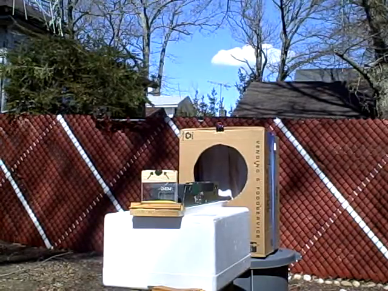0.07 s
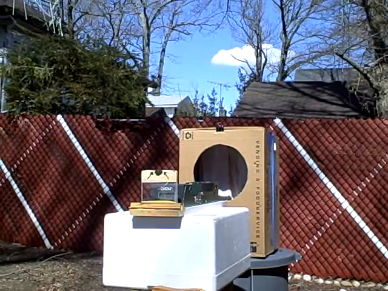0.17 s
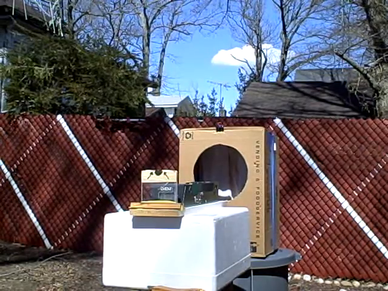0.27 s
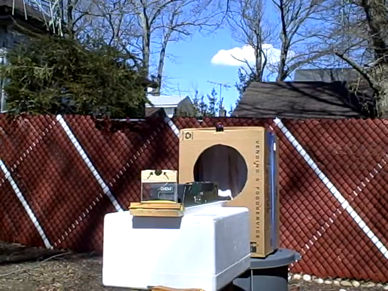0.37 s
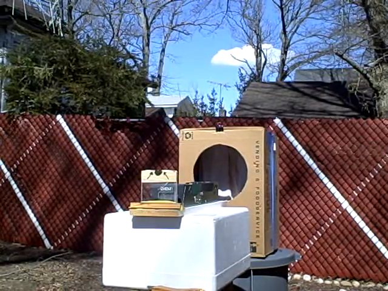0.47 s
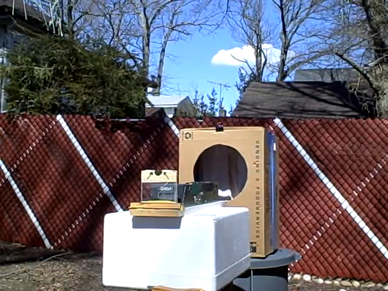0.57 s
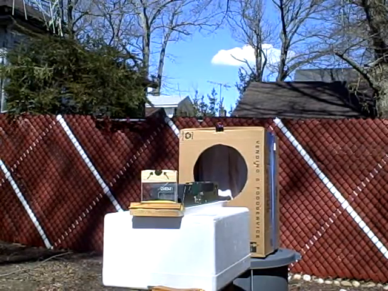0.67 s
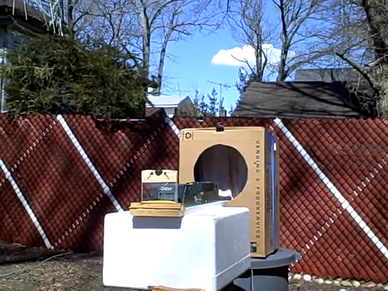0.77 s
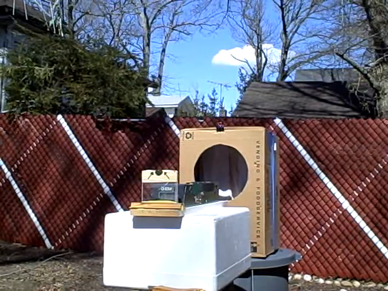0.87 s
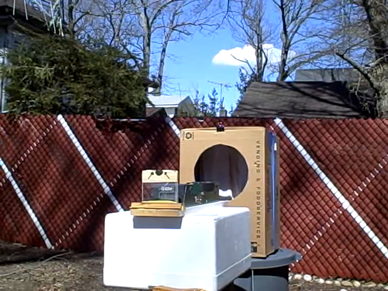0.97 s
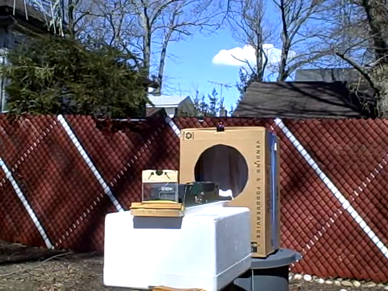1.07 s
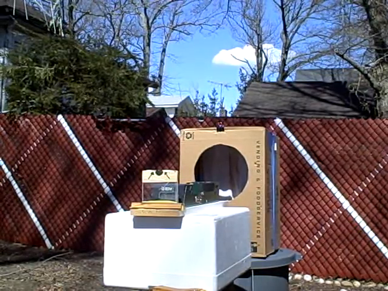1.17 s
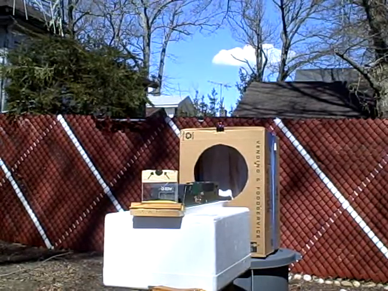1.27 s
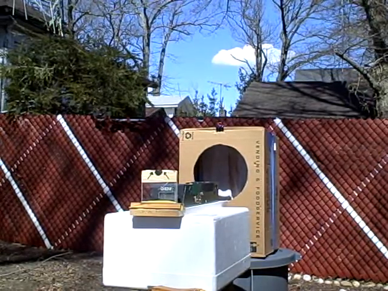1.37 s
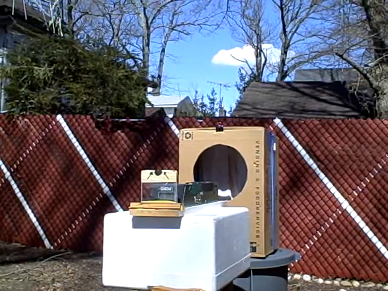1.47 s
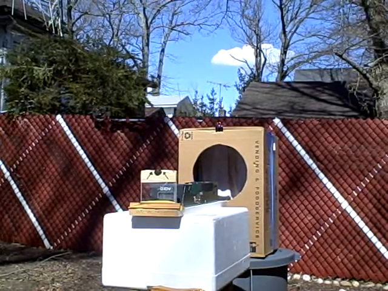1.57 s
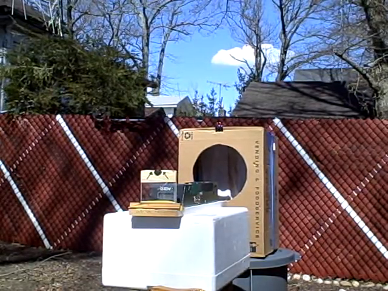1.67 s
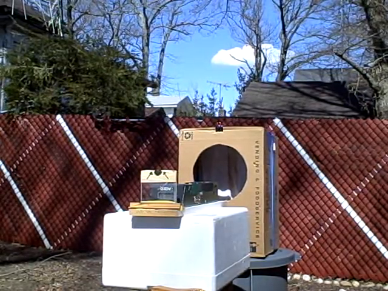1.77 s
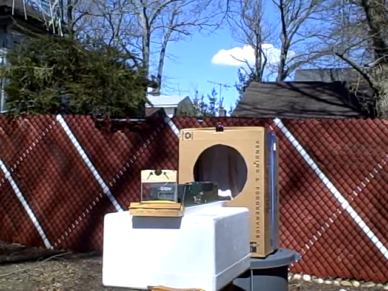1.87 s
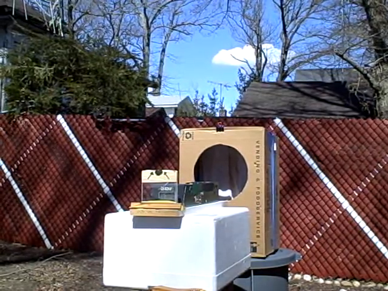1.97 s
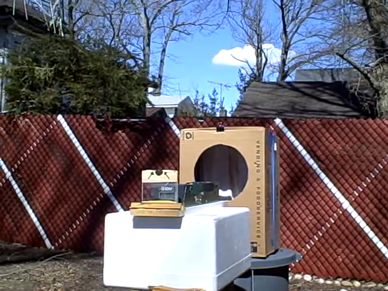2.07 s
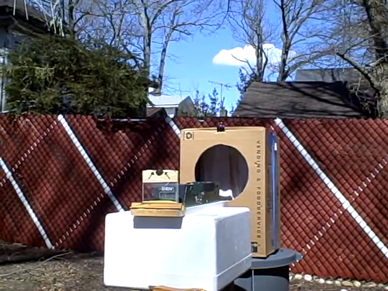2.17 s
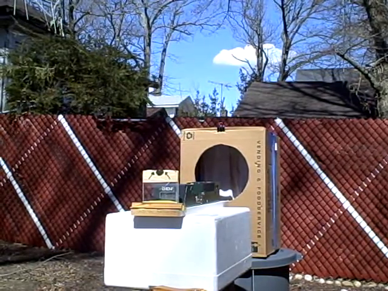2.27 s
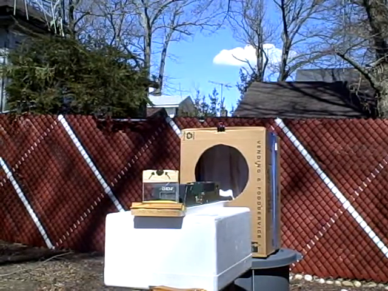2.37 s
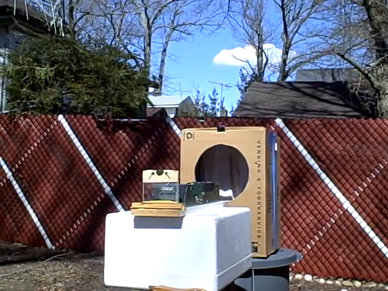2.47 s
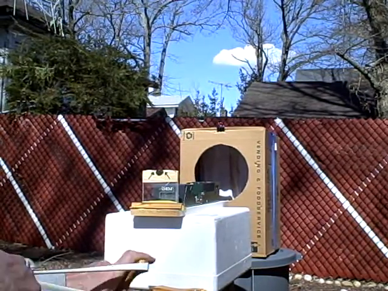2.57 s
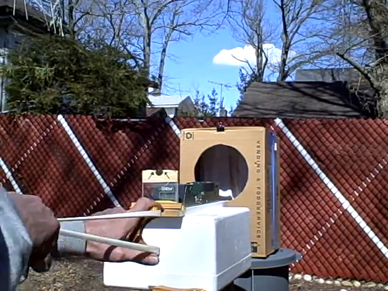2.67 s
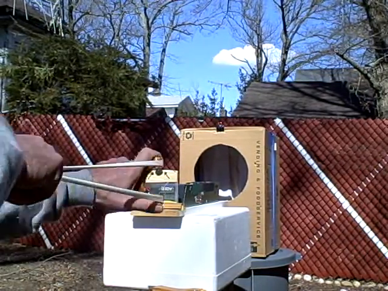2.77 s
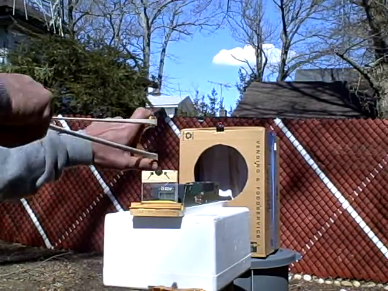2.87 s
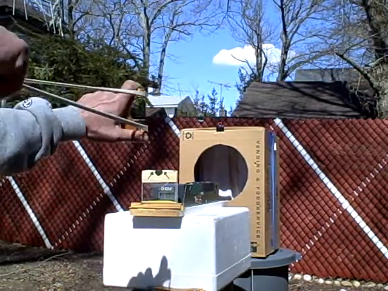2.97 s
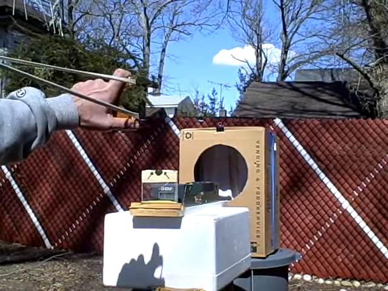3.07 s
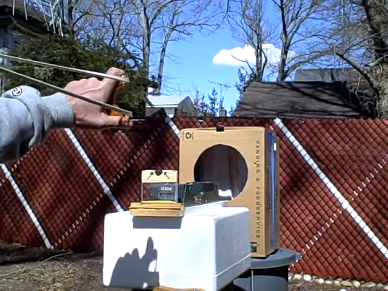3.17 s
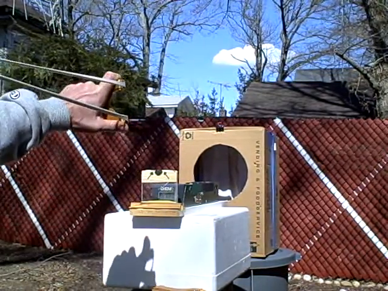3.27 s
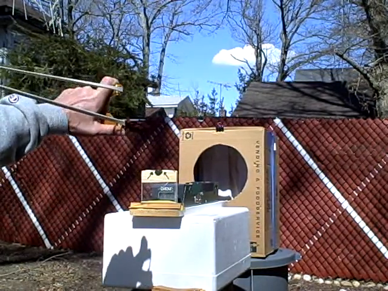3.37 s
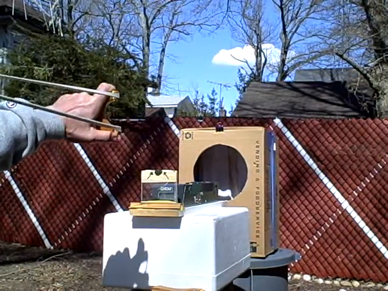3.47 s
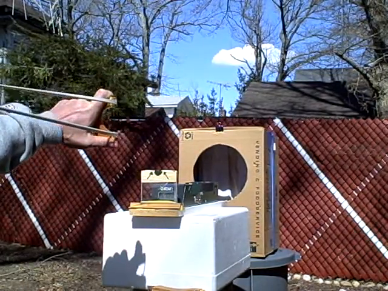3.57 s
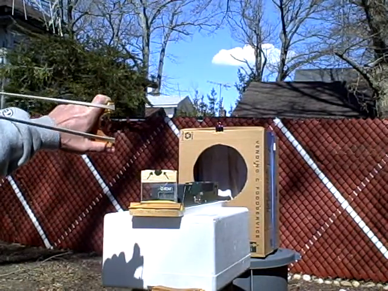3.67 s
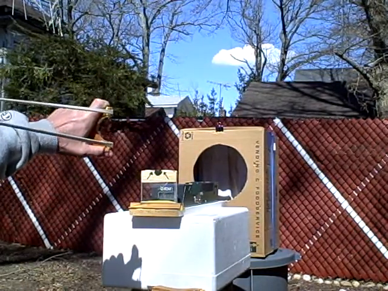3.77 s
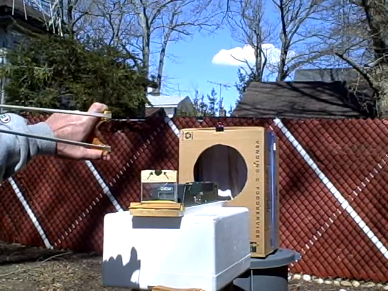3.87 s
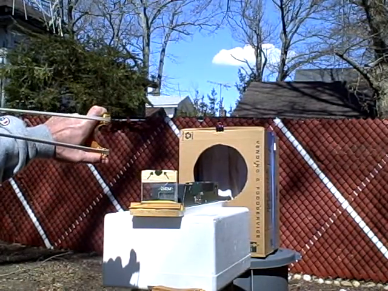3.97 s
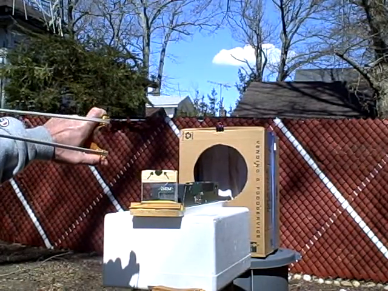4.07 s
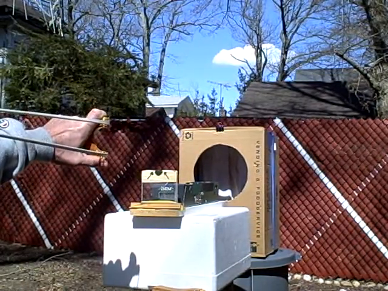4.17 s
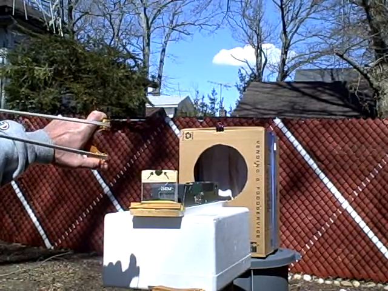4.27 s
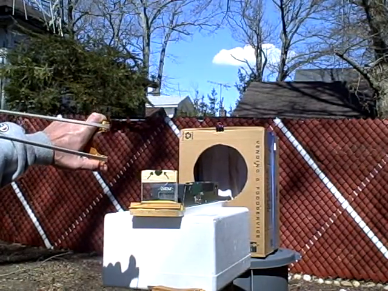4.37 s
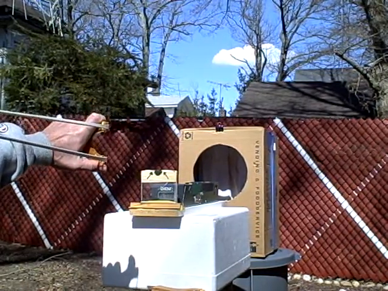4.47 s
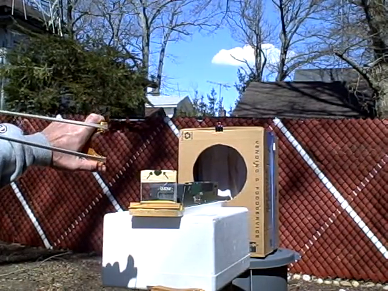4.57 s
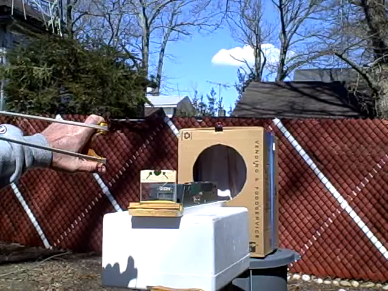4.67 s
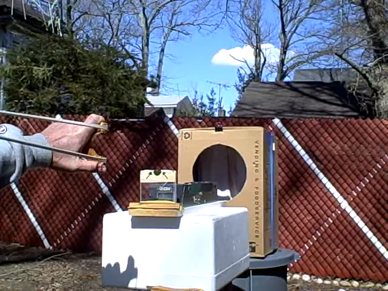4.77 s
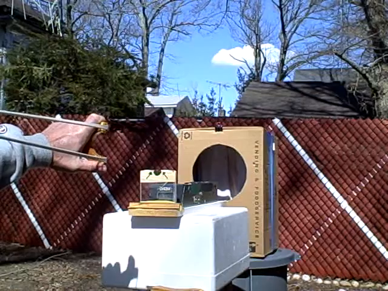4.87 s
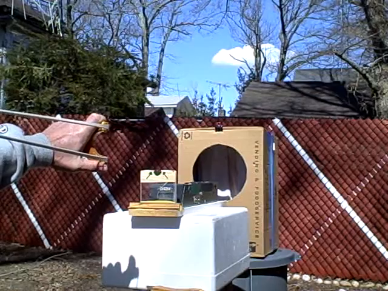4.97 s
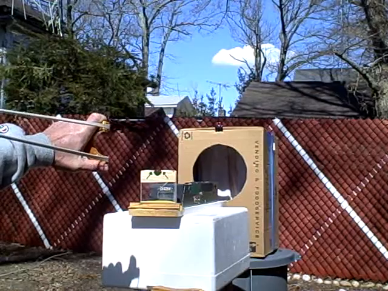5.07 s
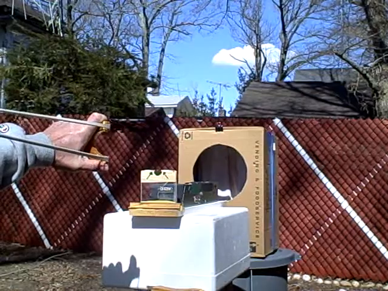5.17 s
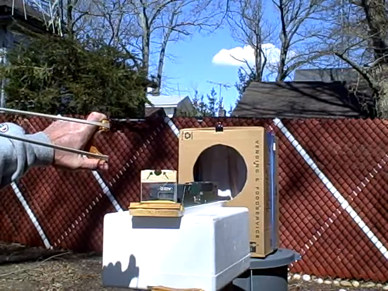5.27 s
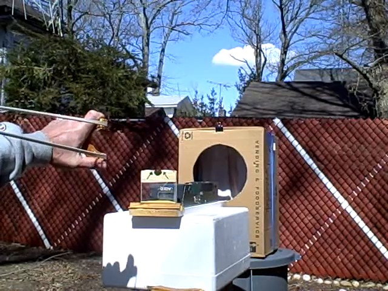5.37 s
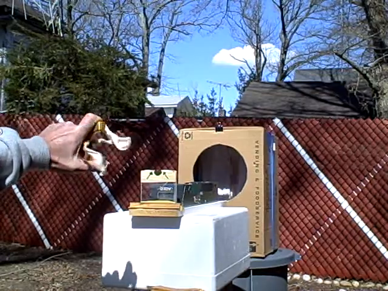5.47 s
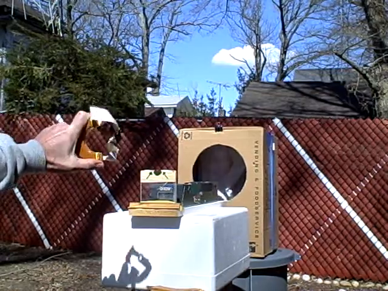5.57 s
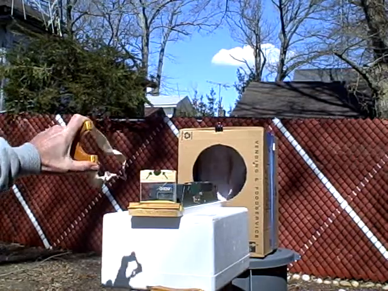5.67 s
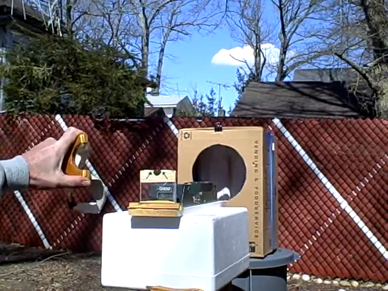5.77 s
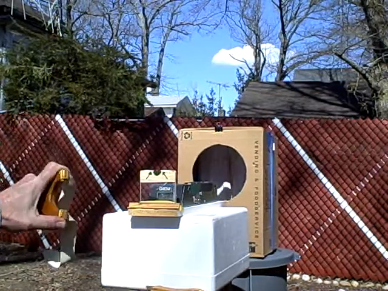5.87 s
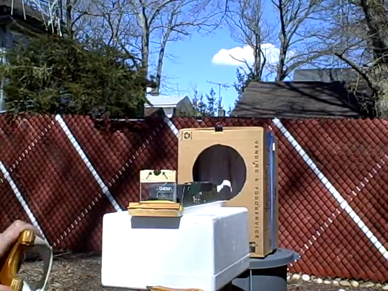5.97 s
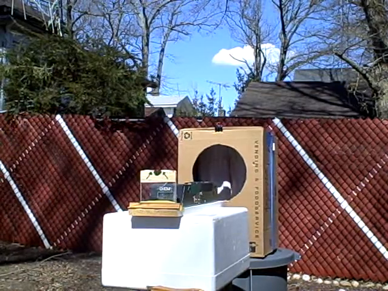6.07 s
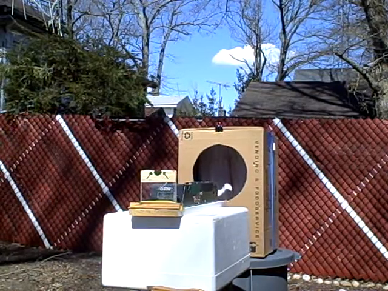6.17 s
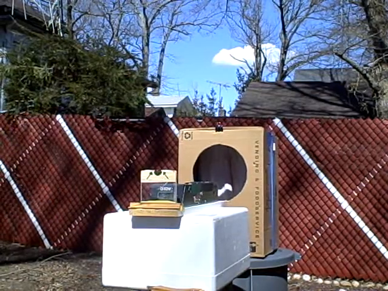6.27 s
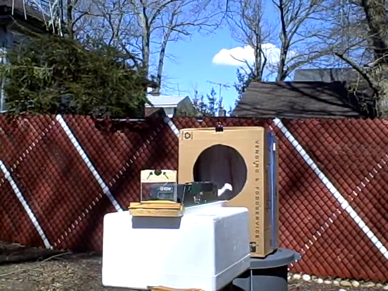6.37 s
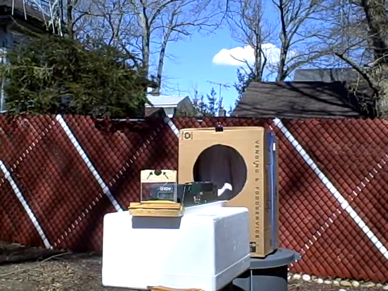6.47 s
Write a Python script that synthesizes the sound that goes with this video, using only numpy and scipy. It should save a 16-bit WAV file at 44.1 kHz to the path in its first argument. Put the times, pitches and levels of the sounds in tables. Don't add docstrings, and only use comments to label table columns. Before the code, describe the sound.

In a breezy backyard, sleeves rustle, then slingshot bands snap with a harsh overloaded crack as a ball thuds into a cardboard box and bounces.

```python
import sys
import numpy as np
from scipy import signal
from scipy.fft import rfft, irfft
from scipy.io import wavfile
from scipy.ndimage import uniform_filter1d

SR = 44100
rng = np.random.default_rng(int(sys.argv[2]) if len(sys.argv) > 2 else 0)


def invert_db(level):
    return 10 ** (np.asarray(level, dtype=float) / 20)


def wav_record(signal):
    frames = np.transpose(np.atleast_2d(signal))
    bounded = np.clip(frames, -1, 1)
    quanta = np.round(bounded * 32767).astype(np.int16)
    wavfile.write(sys.argv[1], SR, quanta)


N = 287443
T = np.arange(N) / SR
RELEASE_S = 5.47


def level(x, db):
    return x * invert_db(db) / np.sqrt(np.mean(x ** 2))


def colour(x, points):
    hz, db = np.transpose(points)
    grid_hz = np.linspace(1, SR / 2, 2049)
    shape_db = np.interp(np.log(grid_hz), np.log(hz), db)
    cepstrum = irfft(np.log(invert_db(shape_db)))
    cepstrum[1:2048] *= 2
    cepstrum[2049:] = 0
    response = irfft(np.exp(rfft(cepstrum)))[:2048]
    return signal.fftconvolve(x, response / np.sqrt(np.sum(response ** 2)))[:N]


def band(lo_hz, hi_hz):
    sos = signal.butter(3, [lo_hz, hi_hz], "band", fs=SR, output="sos")
    return level(signal.sosfilt(sos, rng.standard_normal(N)), 0)


def walk(rate):
    hold = int(SR / rate)
    steps = np.repeat(rng.standard_normal(N // hold + 1), hold)
    smooth = uniform_filter1d(uniform_filter1d(steps, hold), hold)
    return 1.3 * smooth[:N]


def swells(times, dbs, rises, fades):
    rises, fades = np.maximum(rises, 1e-3), np.maximum(fades, 1e-3)
    s, db, rise, fade = (v[:, None] for v in np.broadcast_arrays(times, dbs, rises, fades))
    t = T[::50]
    drop_db = 20 * np.maximum((s - t) / rise, (t - s) / fade)
    return np.interp(T, t, invert_db(np.max(db - drop_db, axis=0)))


def bursts(rows, rise=0.00061):
    out, age = np.zeros(N + SR), T[:SR // 4]
    for s, db, t60 in rows:
        start = int(s * SR)
        decay = np.exp(-np.log(1000) * age / t60)
        out[start:start + len(age)] += invert_db(db) * (1 - np.exp(-age / rise)) * decay
    return out[:N]


def cracks(rows, points):
    ringing = colour(rng.standard_normal(N), points)
    ringing /= uniform_filter1d(np.abs(ringing), size=36) + .12
    fronts = np.zeros(N)
    for s, db, _ in rows:
        fronts[int(s * SR)] += 0.68 * invert_db(db)
    return .46 * ringing * bursts(rows, rise=.0003) + colour(fronts, points)


# frequency in Hz, strength in dB per Hz.
TRAFFIC_COLOUR = [(65, -25.5), (110, -7), (161, -1.5), (231, -3.5), (252, -16.5), (354, -4.5), (422, -10.5),
                  (456, -3), (549, -11), (605, -5.5), (646, -16), (840, -12.5), (969, -16.5), (1060, -24),
                  (1500, -34.5), (1950, -57), (3300, -120)]
# frequency in Hz, strength in dB per Hz.
HISS_COLOUR = [(820, -30), (1400, -5.5), (2650, -7.5), (3100, -4.5), (3700, -9), (5000, -7.5), (6240, -2),
               (7100, -6), (7700, -12.5), (8050, -18.5), (8660, -26.5), (9000, -39), (11700, -60),
               (19800, -120)]
TRAFFIC_DB, HISS_DB = -52, -66


def suburb():
    traffic = level(colour(rng.standard_normal(N), TRAFFIC_COLOUR), TRAFFIC_DB) * invert_db(0.69 * walk(2.3))
    return traffic + level(colour(rng.standard_normal(N), HISS_COLOUR), HISS_DB)


# frequency in Hz, level in dB, loss in dB from one side line to the next.
WHINE_LINES = [(7598, -75.5, 7), (7656.2, -77, 11), (8343.8, -88, 10), (8402, -88, 9)]
# frequency in Hz, level in dB.
LONE_TONES = [(2860, -91), (4740, -92), (4796, -91), (6105, -88)]
READ_OUT_HZ = 58.2


def camera():
    lines = [(hz, invert_db(db)) for hz, db in LONE_TONES]
    for k, (hz, db, fade_db) in enumerate(WHINE_LINES):
        direction = -(-1) ** k
        for side in range(4):
            flip = (-1) ** side
            lines.append((hz + direction * side * READ_OUT_HZ, flip * invert_db(db - fade_db * side)))
    return sum(np.sqrt(2) * size * np.sin(2 * np.pi * hz * T) for hz, size in lines)


# start in seconds, peak in dB, pitch in Hz, length in seconds.
YAP_EVENTS = [
    (0.95, -70, 1320, 0.19),
    (0.956, -65, 1044, .1),
    (1.2, -61.5, 978, 0.15),
    (3.627, -71.5, 1310, 0.16),
    (3.608, -67, 1108, 0.084),
    (3.877, -61, 944, 0.17),
    (4.725, -57.5, 980, 0.15),
    (5.701, -52, 1480, 0.0058),
]


def dog():
    waver = 2 * np.pi * np.cumsum(.012 * walk(90)) / SR
    out = np.zeros(N)
    for s, db, hz, length in YAP_EVENTS:
        age = np.maximum(T - s, 0) / (length / 3)
        swell = np.e * age * np.exp(-age)
        out += invert_db(db) * swell * np.sin(hz * (2 * np.pi * T + waver))
    return out


# loudest moment in seconds, flutter level in dB,
# fade in seconds per 20 dB (below zero: sudden), rumble level in dB.
GUST_EVENTS = [(.22, -39, 0.35, -47), (.35, -32, 0.3, -41), (.54, -33.5, 0.36, -46), (.8, -32, 0.24, -52),
               (.95, -33.5, 0.2, -54), (1.07, -31.5, 0.18, -50), (1.2, -38.5, 0.26, -50.5),
               (1.42, -37.5, 0.34, -58), (1.7, -37, -0.7, -56), (1.84, -34.5, 0.37, -51.5),
               (2.12, -30, 0.43, -49), (2.382, -26, 0.16, -40.5), (2.539, -25.5, 0.2, -40.5),
               (2.749, -28, 0.2, -40), (2.919, -21, 0.05, -33.5), (3.14, -41, 0.6, -60),
               (3.42, -39, 0.3, -57), (3.85, -41, 0.23, -54), (4.08, -42, 0.5, -59),
               (4.36, -34.5, 0.05, -50), (4.72, -52.5, 0.5, -53.5), (4.91, -45.5, -0.2, -54),
               (5.4, -43.5, 0.7, -54), (5.53, -30.5, 0.11, -27.5), (5.72, -44.5, 0.33, -51),
               (5.96, -44, 0.3, -62.5), (6.09, -42.5, .12, -53), (6.36, -45, .2, -55)]
GUST_RISE_SHARE = .8
BREEZE_DB, BREEZE_RUMBLE_DB = -55.5, -59


def wind():
    s, flutter_db, fade, rumble_db = np.transpose(GUST_EVENTS)
    rise = GUST_RISE_SHARE * fade
    flutter = (invert_db(BREEZE_DB) + swells(s, flutter_db, rise, fade)) * band(10.0, 58.7)
    rumble = (invert_db(BREEZE_RUMBLE_DB) + swells(s, rumble_db, rise, fade)) * band(55, 155.0)
    return flutter + rumble * invert_db(1.2 * walk(25))


# loudest moment in seconds, fine weave level in dB, rise in seconds per 20 dB,
# fade in seconds per 20 dB (zero or less: sudden), broad folds level in dB.
ARM_MOVES = [(.33, -74, .3, 1.5, -72), (.56, -61.5, .2, -0.5, -69), (.8, -62.5, 0.76, 0.5, -65.5),
             (.945, -56, 0.16, .04, -72), (1.1, -61, 0.034, .07, -73), (1.22, -54.5, 0.045, 0.05, -71),
             (1.262, -52.5, 0.087, 0.03, -72), (1.5, -65.5, .04, 0, -85), (1.58, -71, .1, .1, -69),
             (1.82, -71, .2, -0.5, -72), (2.02, -62, 0.15, 0.07, -65.5), (2.25, -72, .2, 0.7, -76),
             (2.56, -59, .25, 0.6, -70), (2.72, -55.5, 0.49, 0.63, -69), (3.1, -63.5, 0.56, 0.3, -69.5),
             (3.25, -64.5, .1, 0, -71.5), (5.62, -68, .03, .5, -67), (5.78, -66.5, .3, 2, -77.5),
             (5.96, -61, .3, .3, -66.5), (6.1, -64.5, .2, 2, -76)]
# start in seconds, peak in dB, time to fade by 60 dB in seconds.
CREASES = [(0.6864, -61, 0.025), (0.9174, -52, 0.025), (1.2141, -47, 0.023), (1.2364, -45, 0.027),
           (2.5494, -42, 0.016), (2.658, -57, 0.025), (2.7412, -47, 0.025), (3.114, -45, 0.025),
           (5.6389, -35, 0.015), (5.6772, -24, 0.013), (5.7244, -43.5, 0.028), (5.7793, -49, 0.05),
           (6.037, -45, 0.025), (6.0943, -42, 0.027)]
# frequency in Hz, strength in dB per Hz.
WEAVE_COLOUR = [(900, -46.5), (1600, -19), (3200, -17.5), (4500, -13.5), (5230, -10.5), (5980, 2),
                (6660, -0.5), (7900, -12.5), (8670, -28), (9000, -33), (11700, -61.5), (19800, -120)]


def rustle():
    grain = invert_db(walk(300) + walk(40))
    s, fine_db, rise, fade, folds_db = np.transpose(ARM_MOVES)
    fine = swells(s, fine_db, rise, fade) + 0.47 * bursts(CREASES)
    weave = colour(level(grain * rng.standard_normal(N), 0) * fine, WEAVE_COLOUR)
    folds = swells(s, folds_db, rise, fade) * level(grain * band(4300, 5300), 0)
    return weave + folds


# loudest moment in seconds, level in dB.
SCUFF_EVENTS = [
    (5.6, -72),
    (5.95, -66.5),
    (6.3, -74),
]
SCUFF_RISE_S, SCUFF_FADE_S = .3, 0.91


def settling():
    s, db = np.transpose(SCUFF_EVENTS)
    scuffs = swells(s, db, SCUFF_RISE_S, SCUFF_FADE_S) * (T > RELEASE_S)
    return scuffs * invert_db(2 * walk(150)) * band(900, 3800)


# start in seconds, peak in dB, time to fade by 60 dB in seconds.
LANDINGS = [
    (5.8800, -18, 0.013),
    (5.8815, -16.5, 0.015),
    (5.8850, -28, 0.14),
    (5.9100, -41, 0.016),
    (6.2955, -37.5, 0.042),
]
# frequency in Hz, strength in dB per Hz.
LANDING_COLOUR = [(530, -29), (900, -1), (1310, -11.5), (3000, -4), (3530, -13), (4080, -5), (4630, -8.5),
                  (6490, 5), (9000, -40), (11700, -66), (19800, -120)]


def bounces():
    return cracks(LANDINGS, LANDING_COLOUR)


# start in seconds, level in dB, contact time in seconds, chatter time in seconds,
# pitch of the struck panel in Hz.
BALL_BLOWS = [
    (5.4750, -29, 0.00035, 0.0023, 850),
    (5.5035, -4.5, .0003, .0006, 340),
    (5.5075, -7.5, 0.00023, .008, 860),
    (5.5200, -16, .0007, .004, 310),
    (5.8825, -21, .0003, .005, 640),
    (5.8930, -26.5, .0002, 0.0089, 830),
    (5.9090, -26, .0004, 0.016, 620),
    (6.2963, -24.5, 0.00094, 0.0014, 389),
]
# frequency in Hz, level in dB, time to fade by 60 dB in seconds.
BOX_MODES = [(79.5, -17, 0.071), (150, -17.5, .12), (247, -5, 0.078), (304, 0, .09), (384, -4.5, 0.053),
             (484, -7, 0.093), (568, -12, .06), (696, -5, 0.069), (851, 0, 0.043), (1050, -7.5, 0.038),
             (1320, -8.5, 0.03), (1670, -8.5, .03), (2150, -6.5, 0.056), (2900, 0, 0.044)]
RING_SHARE = 0.84


def box():
    out, t = np.zeros(N + SR), T[:SR // 4]
    hz, db, t60 = np.array(BOX_MODES).T[:, :, None]
    spots = rng.standard_normal((len(BALL_BLOWS), len(BOX_MODES), 1))
    grits = rng.standard_normal((len(BALL_BLOWS), len(t)))
    decay = np.exp(-np.log(1000) * t / (t60 * RING_SHARE))
    for (s, blow_db, contact, chatter, panel_hz), spot, grit in zip(BALL_BLOWS, spots, grits):
        ring = invert_db(db + 1.5 * spot) * np.sin(2 * np.pi * hz * (1 + 0.018 * spot) * t) * decay
        soft = 1 / (1 + (2 * hz * contact) ** 2)
        soft = soft / (1 + (2.6 * np.log(hz / panel_hz)) ** 2 + (0.36 * panel_hz / hz) ** 4)
        push = 0.097 * grit * np.exp(-t / chatter)
        push[0] = 1
        thud = signal.fftconvolve((ring * soft).sum(axis=0), push)[:len(t)]
        start = int(s * SR)
        out[start:start + len(t)] += 0.44 * invert_db(blow_db) * thud
    return signal.sosfilt(signal.butter(2, 120, "high", fs=SR, output="sos"), out[:N])


# start in seconds, peak in dB,
# time to fade by 60 dB in seconds.
BAND_SLAPS = [(5.447, -34.5, 0.01), (5.4532, -25, 0.018), (5.4660, -18, .03), (5.4714, 2.5, .025),
              (5.4730, -1, .022), (5.4746, -1, .012), (5.4772, 0, .007), (5.4790, 0, .007),
              (5.4807, 2, .01), (5.4843, 0, .011), (5.4904, 0, .009), (5.4925, -5, .008),
              (5.4940, -6, .012), (5.5023, 3, .014), (5.5043, -1, .011), (5.5067, -2, .009),
              (5.5212, -5, .025), (5.5230, -3, .012), (5.512, -10, 0.029), (5.516, -8, 0.022),
              (5.5275, -11.5, 0.04), (5.538, -13, 0.017), (5.5455, -20, 0.024), (5.5545, -21, 0.016),
              (5.5603, -13.5, 0.013)]
# frequency in Hz, strength in dB per Hz.
BAND_COLOUR = [(59, -48), (100, -35), (534, -8.5), (695, -24.5), (855, -9), (1090, -20.5), (1850, -16.5),
               (3650, -12.5), (4660, -10), (6660, 4), (9000, -31.5), (11700, -45.5), (19800, -120)]
CLIMB_S, FLAP_S, RUSH_FADE_S, RUSH_DB = .018, 0.053, .055, -22.5


def bands():
    before = (RELEASE_S - T) / CLIMB_S
    after = (T - RELEASE_S - FLAP_S) / RUSH_FADE_S
    drop = np.maximum(np.maximum(before, after), 0)
    air = rng.standard_normal(N) * invert_db(RUSH_DB - 20 * drop) * invert_db(3.5 * walk(400))
    return colour(air, BAND_COLOUR) + cracks(BAND_SLAPS, BAND_COLOUR)


# delay in seconds, time to fade by 60 dB in seconds, level in dB.
ECHOES = [(.008, .3, -21),
          (.06, 0.86, -33)]


def yard_echo(shot):
    t = T[:SR]
    echo = 0
    for delay, t60, db in ECHOES:
        tail = rng.standard_normal(len(t)) * (t > delay) * np.exp(-np.log(1000) * t / t60)
        echo = echo + invert_db(db) * tail / np.sqrt(np.sum(tail ** 2))
    return signal.lfilter([.45], [1, -.55], signal.fftconvolve(shot, echo)[:N])


def scene():
    yard = suburb() + camera() + dog() + wind() + rustle() + settling()
    shot = bounces() + box() + bands()
    return (yard + shot + yard_echo(shot))[None]


def top_cut(x):
    return signal.sosfilt(signal.butter(12, 16500, fs=SR, output="sos"), x)


def record(dry):
    mic_top_hz, clip_level, treble_top_hz = 8950, .72, 16000
    x = signal.sosfilt(signal.ellip(12, .5, 70, mic_top_hz, fs=SR, output="sos"), dry)
    x = np.clip(x, -clip_level, clip_level)
    x = signal.sosfilt(signal.ellip(8, .2, 70, treble_top_hz, fs=SR, output="sos"), x)
    return top_cut(x)


dry = scene()
out = record(dry)
wav_record(out)
```